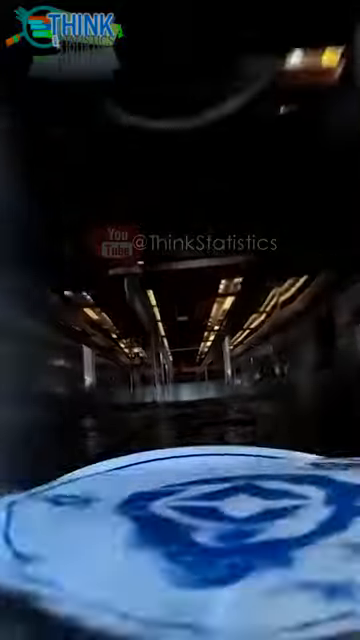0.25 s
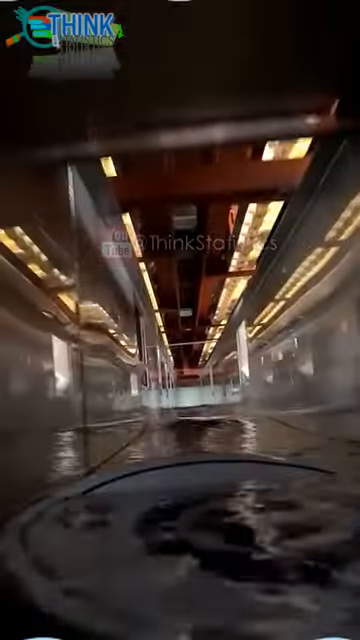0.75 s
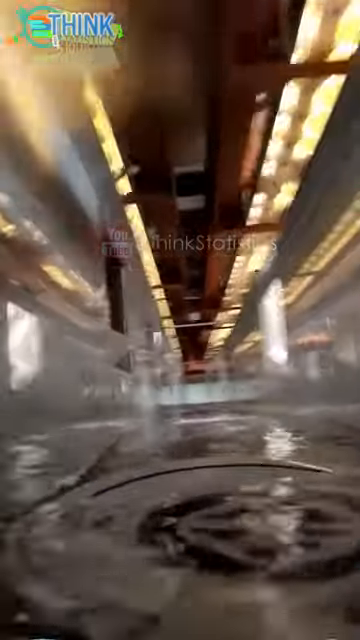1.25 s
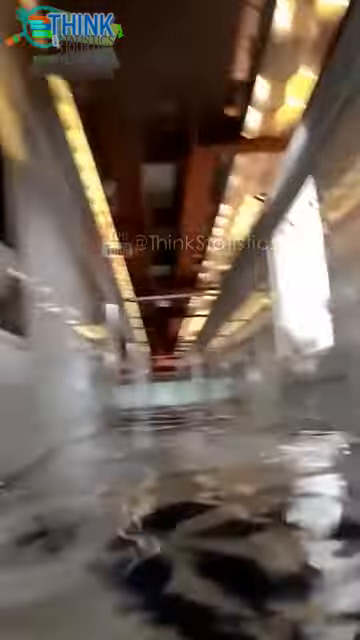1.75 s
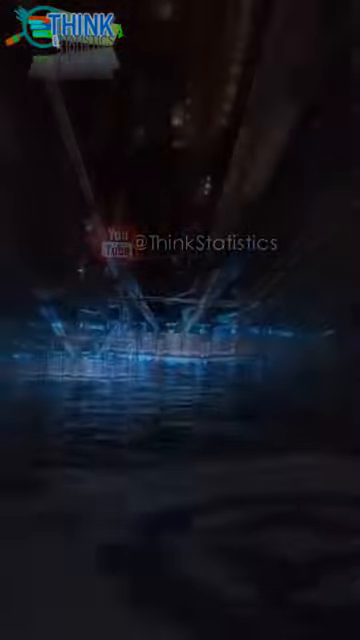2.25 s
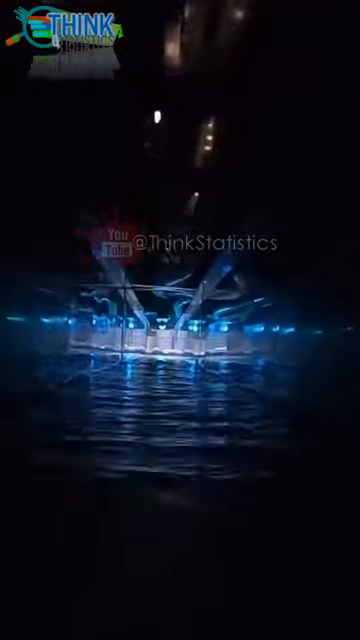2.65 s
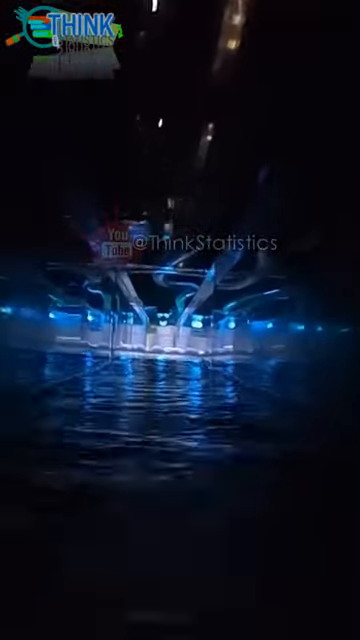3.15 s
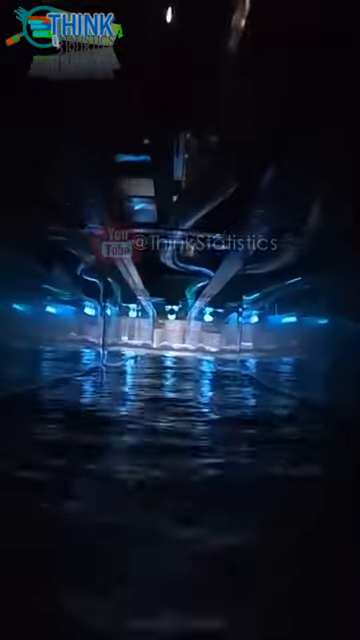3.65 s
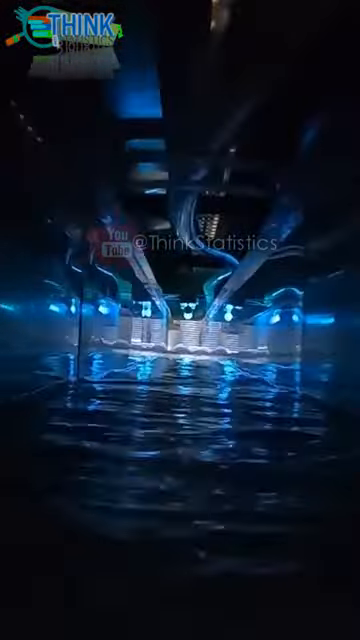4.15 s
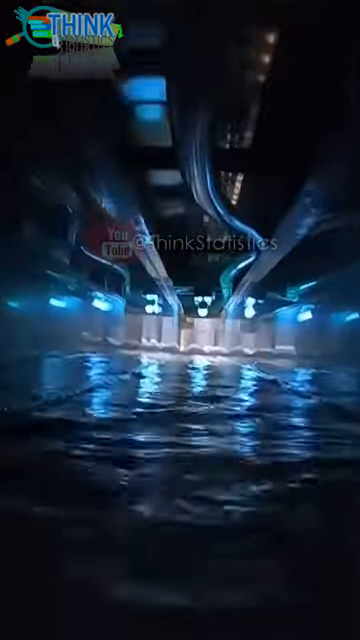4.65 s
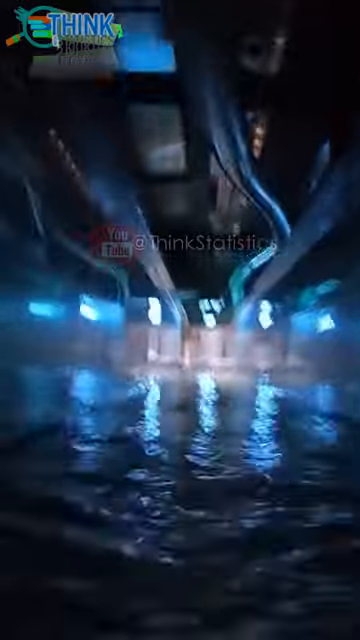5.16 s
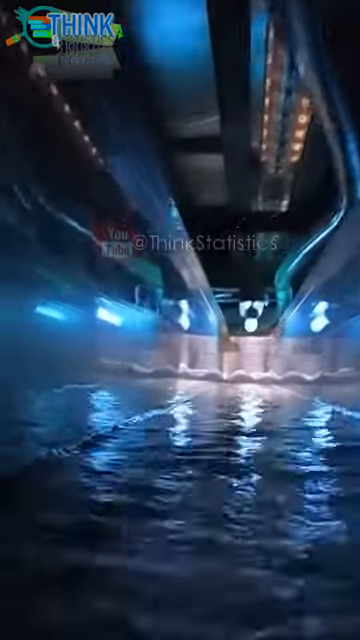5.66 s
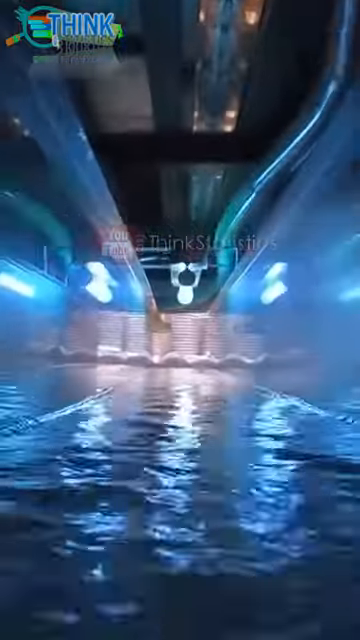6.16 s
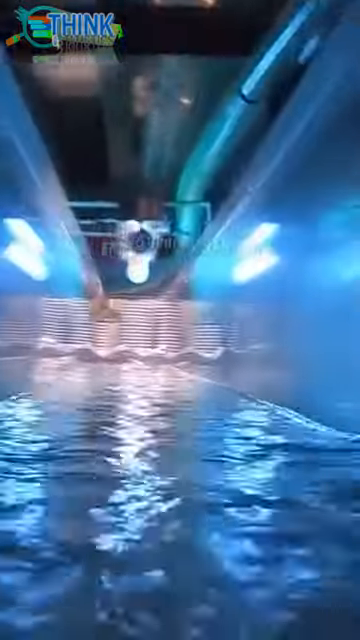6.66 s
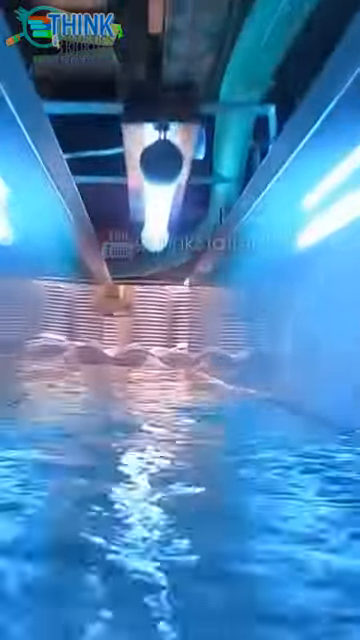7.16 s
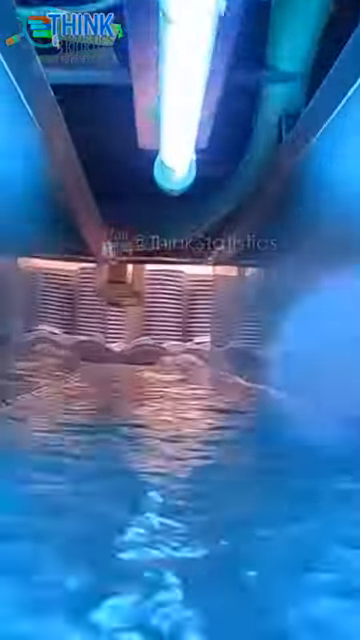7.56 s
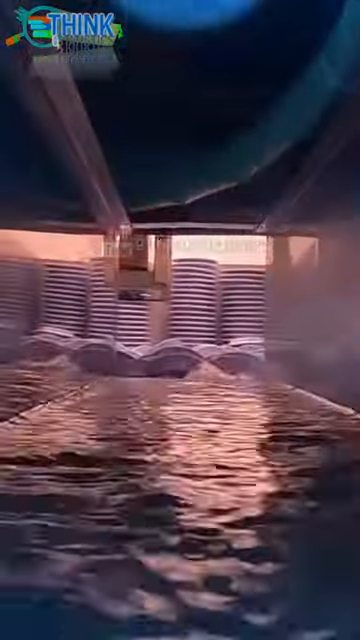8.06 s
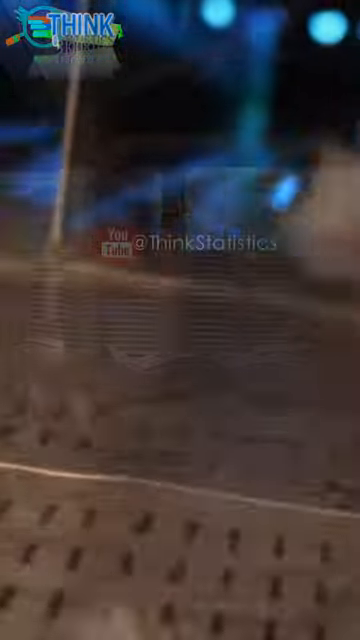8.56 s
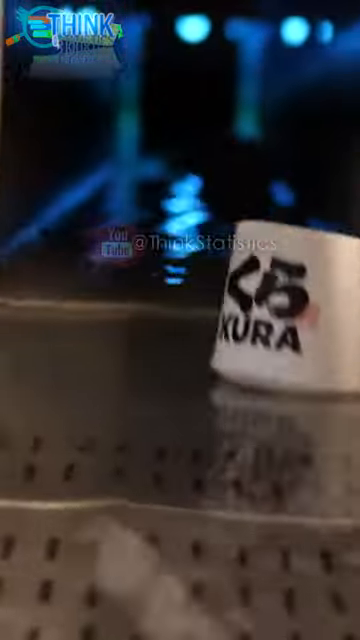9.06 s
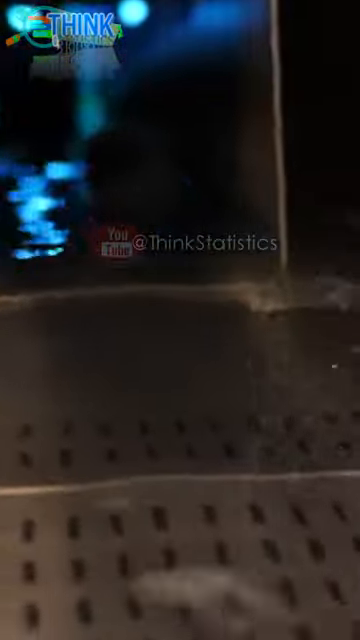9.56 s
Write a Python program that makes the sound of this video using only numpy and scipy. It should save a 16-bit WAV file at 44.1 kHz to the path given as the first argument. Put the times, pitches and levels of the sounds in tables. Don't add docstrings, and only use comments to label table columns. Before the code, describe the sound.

Steady booming machine hum with water moving around a waterproof microphone. At first it is mono and boxy, with swelling gurgles, hollow bubble plops, tiny wet chirps, low slaps and hard ticks. Near six seconds the perspective jumps to open stereo near the sprays, with wavering motor tones on the right, bright spatter on the left, and a dense burst of splashes and bubbles around eight seconds.

```python
import sys
import numpy as np
from scipy import signal
from scipy.fft import rfft, irfft, next_fast_len
from scipy.io import wavfile
from scipy.ndimage import uniform_filter1d, map_coordinates

SR = 44100
rng = np.random.default_rng(int(sys.argv[2]) if len(sys.argv) > 2 else 0)


def persist_wave(psi):
    counts = np.round(np.clip(psi, -1, 1) * 32767).astype(np.int16)
    wavfile.write(sys.argv[1], SR, np.atleast_2d(counts).T)


def volts_from_decibels(level):
    exponent = np.asarray(level, float) / 20
    return 10 ** exponent


N = 432180
JUMP_S = 6.07


def unit(x):
    return x / np.sqrt(np.mean(x ** 2) + 1e-20)


def along(points, hz):
    f, v = np.transpose(points)
    return np.interp(np.log(hz + 1), np.log(f + 1), v)


def curves(rows):
    s, *columns = np.transpose(rows)
    return [np.interp(np.arange(N) / SR, s, column) for column in columns]


def wobble(rate):
    at = np.arange(0, N + 32, 32)
    knots = rng.standard_normal(int(N * rate / SR) + 4)
    return np.interp(np.arange(N), at, map_coordinates(knots, [at * rate / SR]))


def filtered(x, response):
    m = next_fast_len(N + 8192)
    return irfft(rfft(x, m) * response(np.fft.rfftfreq(m, 1 / SR)), m)[..., :N]


def colour(spectrum, peaks, hz):
    bells = sum(db / (1 + (2 * (hz - centre) / width) ** 2) for centre, width, db in peaks)
    return volts_from_decibels(along(spectrum, hz) + bells)


def band(hz, lo_hz, hi_hz):
    return 1 / np.sqrt((1 + (lo_hz / (hz + 1)) ** 12) * (1 + (hz / hi_hz) ** 12))


def water(patchy_db, per_second, spread_db, channels):
    z = signal.stft(rng.standard_normal((channels, N)), nperseg=256)[2]
    across_pitch = uniform_filter1d(rng.standard_normal(z.shape[1:]), 3, 0)
    field = uniform_filter1d(across_pitch, 9, 1)
    hiss = unit(signal.istft(z * volts_from_decibels(patchy_db * unit(field)), nperseg=256)[1][:, :N])
    size = np.minimum(rng.exponential(size=N), 2.5)
    hit = (rng.random(N) < per_second / SR) * volts_from_decibels(spread_db * size)
    fall = [1, -np.exp(-1 / (0.0013 * SR))]
    bursts = signal.lfilter([1], fall, signal.lfilter([1], fall, hit))
    return hiss, unit(bursts) ** 2


def pings(s, db, hz, cycles, rise, attack):
    t = np.arange(SR // 25)[None] / SR
    life = (cycles / hz)[:, None]
    phase = 2 * np.pi * hz[:, None] * (t + rise * t * t / (2 * life))
    wave = volts_from_decibels(db)[:, None] * np.sin(phase) * volts_from_decibels(-26 * t / life) * (1 - np.exp(-t / attack))
    at = (np.round(s * SR).astype(int)[:, None] + np.arange(t.size)).ravel()
    return np.bincount(at, wave.ravel(), N + SR)[:N]


def cracks(s, db, t60, size=41):
    blows = np.bincount(np.round(s * SR).astype(int), volts_from_decibels(db), N)
    shape = signal.lfilter([1], [1, -volts_from_decibels(-60 / (t60 * SR))], blows)
    return np.abs(uniform_filter1d(shape, size=size)) * rng.standard_normal(N)


def after():
    return np.clip((np.arange(N) / SR - JUMP_S) / .004, 0, 1)


# start_s, level_db
PUMP_LEVEL = [(0.0, -13), (3.08, -12), (8.57, -12.5), (9.8, -14)]
# pitch_hz, level_db (per Hz)
PUMP_NOISE = [(15, -34), (25, -15), (55, -3), (141, -6), (172, -6), (222, -8.5), (309, -18), (403, -21.5),
              (424, -16.5), (520, -26.5), (680, -33), (1140, -120)]
# pitch_hz, width_hz, level_db
DUCT_RESONANCES = [(71.6, 4.1, 8), (99.6, 10.3, 4.5), (142, 26, 8)]
# pitch_hz, level_db (rms), waver_rad
MOTOR_TONES = [
    (100, -28, .4),
    (143, -29, 1.6),
    (430.6, -38, .35),
]
# pitch_hz, level_db (per Hz)
PORT_DIFFERENCE = [(15, -40), (25, -18), (64, -7), (108, 6), (140, 5.5), (212, -6), (260, -5), (340, -49),
                   (570, -120)]


def pump():
    level_db, = curves(PUMP_LEVEL)
    boom = unit(filtered(rng.standard_normal(N), lambda hz: colour(PUMP_NOISE, DUCT_RESONANCES, hz)))
    side = unit(filtered(rng.standard_normal(N), lambda hz: volts_from_decibels(along(PORT_DIFFERENCE, hz))))
    t = np.arange(N) / SR
    mid = volts_from_decibels(level_db - 5.0) * boom
    for hz, db, waver in MOTOR_TONES:
        mid += volts_from_decibels(db + 3 + 1.8 * wobble(4)) * np.sin(2 * np.pi * hz * t + waver * wobble(7))
    return mid + volts_from_decibels(-27) * after() * side * [[1], [-1]]


# pitch_hz, level_db (rms)
SECOND_MOTOR = [(371, -31), (760, -44), (272, -35), (437, -34)]


def hum():
    t = np.arange(N) / SR
    tones = np.zeros(N)
    for hz, db in SECOND_MOTOR:
        tones += volts_from_decibels(db + 3 * wobble(3)) * np.sin(2 * np.pi * hz * t + .8 * wobble(6))
    return tones * after() * volts_from_decibels([[-4], [4]])


def gurgle(count, centre_hz, cycles):
    when, pitch, size = rng.random((3, count))
    hz = centre_hz * 2 ** (1.2 * pitch - .6)
    return unit(pings(when * JUMP_S, -4 * np.log(1 - .9 * size), hz, cycles, .04, .004))


# start_s, churn_db, spray_db
FLOW = [(0, 4, -2.5), (.2, -6.5, -6.5), (.77, -9, -4.5), (.96, -11, -8), (.98, -5.5, 4.5), (1.38, 4.5, 3),
        (1.98, 2, 3), (2.18, 2.5, -3), (2.59, 8.5, 4.5), (2.83, 13.5, 3.5), (3.21, 9.5, 4), (3.54, 8.5, 3),
        (3.95, 0, 2), (4.85, 3.5, 3.5), (4.99, 6, 4.5), (5.39, 2.5, -0.5), (5.8, 2.5, 1.5), (6.07, -2, -4)]
# rest_db, db_per_churn_db, db_per_spray_db
WASH_LAYERS = [
    (-32, 0.3444, -0.33),
    (-37.5, 1.0, -0.24),
    (-45.5, -0.06, 0.42),
    (-53.5, 0.04, 1),
]
# pitch_hz, level_db (per Hz)
SEALED_WATER = [(180, -53), (300, -0.5), (427, 6), (486, 5.5), (599, 11), (881, -7), (1500, -11),
                (1760, -9), (2280, -27), (3190, -31.5), (3630, -30.5), (4120, -24), (4770, -39),
                (6070, -44), (14300, -68.5), (15600, -95)]
# pitch_hz, width_hz, level_db
HOUSING = [(570, 190, -3), (1190, 49, 1.5), (1750, 170, 3), (3100, 640, 10), (4160, 4600, -6.5),
           (6040, 320, 2.5)]


def wash():
    edges_hz = [(250, 1000), (1000, 2300), (2300, 5300), (5300, 12000)]
    grain = [0.24, 0.33, 0.056, 0.074]
    churn_db, spray_db = curves(FLOW)
    hiss, bursts = water(2.6, 70, 5.8, channels=1)
    bubbles = .13 * gurgle(count=900, centre_hz=1400, cycles=16)
    out = np.zeros(N)
    for (rest_db, by_churn, by_spray), (lo, hi), share in zip(WASH_LAYERS, edges_hz, grain):
        noise = hiss[0] * np.sqrt(1 + share * bursts) + bubbles
        layer = unit(filtered(noise, lambda hz: colour(SEALED_WATER, HOUSING, hz) * band(hz, lo, hi)))
        out += volts_from_decibels(rest_db + by_churn * churn_db + by_spray * spray_db) * layer
    return out * (1 - after())


# start_s (middle), level_db (low hiss), half_length_s,
# bright_db (bright hiss above the low)
WATER_SHEETS = [(0.042, -44, 0.019, -20), (0.174, -37, 0.011, -16), (0.487, -38, 0.063, -16),
                (1.024, -37, 0.039, 2.5), (4.85, -50.5, 0.27, -0.5), (4.975, -33, 0.014, -34),
                (5.677, -31.5, 0.05, -14), (6.672, -30.5, 0.011, 0.5), (1.18, -30.5, 0.028, -14),
                (1.337, -49, 0.021, 7), (1.407, -28.5, 0.015, -26), (2.115, -27, 0.016, -16),
                (2.137, -26.5, 0.011, -32), (2.25, -46, 0.026, 0), (2.454, -27.5, 0.017, -28),
                (2.937, -30, 0.038, -19), (3.695, -28.5, 0.035, -20), (4.523, -29, 0.015, -19),
                (4.867, -29.5, 0.035, -16), (5.15, -23.5, 0.028, -16), (5.402, -32, 0.079, -9.5),
                (5.929, -27, 0.02, -32), (6.014, -36, 0.038, -6), (8.172, -35, 0.048, -8),
                (8.438, -30.5, 0.052, -29), (8.502, -47, 0.0083, -2)]
# pitch_hz, width_hz, level_db
COVERED_HOUSING = [(1190, 200, 6), (1770, 220, 11), (2500, 300, 5), (3180, 220, 18), (4250, 380, 17),
                   (6150, 500, 15)]


def puffs():
    t = np.arange(0, N, 32) / SR
    slope = [(700, -3), (2000, -8), (3000, -16), (4500, -19), (7000, -28), (12000, -46)]  # Hz, dB
    out = np.zeros(N)
    for k, (lo, hi) in enumerate([(750, 2300), (2300, 12000)]):
        swell = np.zeros(len(t))
        for s, db, half, bright_db in WATER_SHEETS:
            swell += volts_from_decibels(db + k * bright_db) * np.exp(-((t - s) / half) ** 4)
        noise = rng.standard_normal(N)
        hiss = unit(filtered(noise, lambda hz: colour(slope, COVERED_HOUSING, hz) * band(hz, lo, hi)))
        out += np.interp(np.arange(N) / SR, t, swell) * hiss
    return out * volts_from_decibels(1.5 * wobble(60))


# start_s, level_db
JET_STRENGTH = [(6.07, 1), (6.3, 0.5), (6.98, 2.5), (7.63, 0), (8.1, 2.5), (8.27, 4.5), (8.6, 4), (9.44, 2),
                (9.8, 3.5)]
# rest_db, db_per_strength_db
JET_LAYERS = [
    (-25.5, 0.5),
    (-28.5, 0.86),
    (-48, 0.5),
    (-49, 2),
]
# pitch_hz, level_db (per Hz)
LEFT_PORT = [(200, -88), (280, -43), (400, -50.5), (620, -57.5), (900, -60.5), (1380, -64.5), (2400, -79),
             (3400, -75), (5400, -85), (6300, -76), (7300, -76), (10300, -72), (12000, -81.5), (16000, -85)]
# pitch_hz, level_db (per Hz)
RIGHT_PORT = [(200, -46), (280, -32), (440, -44.5), (490, -53.5), (760, -58.5), (1000, -68.5), (1500, -68),
              (2400, -79), (4000, -70), (5400, -84.5), (6000, -84), (7500, -93), (9500, -88), (13000, -86)]
# pitch_hz, width_hz, level_db
LEFT_RING = [(275, 16, 10.5), (524, 8.1, 10), (646, 4.9, 11.5), (1350, 27, 5), (1620, 60, 7),
             (2890, 150, 9.5), (3895, 140, 12), (4530, 1100, 11.5), (6250, 180, 3), (8200, 1000, 1.5)]
# pitch_hz, width_hz, level_db
RIGHT_RING = [(302, 39, -12), (362, 44, 6), (420, 3, 10), (587, 18, 5), (760, 25, 9.5), (869, 50, 10),
              (1350, 70, 5), (1620, 60, 7), (3900, 170, -6)]
# pitch_hz, likeness (0 to 1)
PORT_LIKENESS = [(250, 0), (380, 0.16), (550, 0), (900, 0.0053), (1400, 0.86), (3100, 0.63), (6800, 0),
                 (15000, 0.028)]


def spray():
    edges_hz = [(200, 470), (470, 2300), (2300, 5500), (5500, 17000)]
    grain = [.01, 0.034, 0.1, 0.2]
    strength_db, = curves(JET_STRENGTH)

    def split(hz):
        turn = np.arccos(np.clip(along(PORT_LIKENESS, hz), -1, 1)) / 2
        return np.array([np.cos(turn), np.sin(turn)])

    def ports(hz):
        return np.array([colour(LEFT_PORT, LEFT_RING, hz), colour(RIGHT_PORT, RIGHT_RING, hz)])

    hiss, bursts = water(2.1, 160, 3.5, channels=2)
    mid, side = filtered(hiss, split)
    out = np.zeros((2, N))
    for (rest_db, grows), (lo, hi), share in zip(JET_LAYERS, edges_hz, grain):
        pair = np.array([mid + side, mid - side]) * np.sqrt(1 + share * bursts * [[1], [.25]])
        layer = unit(filtered(pair, lambda hz: ports(hz) * band(hz, lo, hi)))
        flutter_db = 1.2 * (lo > 2000) * wobble(7)
        out += volts_from_decibels(rest_db + grows * strength_db + flutter_db) * layer
    return out * after()


# start_s, level_db (rms)
GLANCING_JETS = [(6.246, -29.5), (6.27, -36), (8.375, -33), (9.585, -34)]


def sizzle():
    s, db = np.transpose(GLANCING_JETS)
    rush = filtered(cracks(s, db + 7, 0.14, size=41), lambda f: band(f, 3700, 5000))
    return volts_from_decibels([[3], [-4]]) * rush


# start_s, level_db (peak), pitch_hz, life_cycles
SINGING_BUBBLES = [(0.17, -13, 1400, 15), (0.94, -36, 2400, 74), (0.945, -26, 1890, 52),
                   (0.98, -31, 3150, 63), (1.0394, -27, 3280, 90), (2.105, -16, 3100, 28),
                   (2.116, -18, 3080, 28), (2.129, -12, 880, 22), (2.13, -17, 1800, 30),
                   (2.207, -29, 3260, 40), (2.209, -17, 1780, 35), (2.43, -18, 1850, 38),
                   (2.4773, -21, 3000, 60), (2.5835, -26, 4130, 51), (2.659, -26, 4100, 60),
                   (2.7237, -28, 4160, 70), (3.2, -13, 1280, 20), (3.71, -16, 940, 41),
                   (4.3, -22, 1400, 58), (4.362, -13, 1600, 20), (5.575, -26, 1380, 30),
                   (5.623, -23, 1396, 100), (5.6381, -22, 3500, 30), (5.755, -22, 1750, 50),
                   (5.815, -15, 1250, 19), (5.881, -14, 2150, 25), (6.0214, -29, 3110, 60),
                   (7.6, -22, 1670, 18), (8.395, -21, 1400, 28), (8.408, -19, 1900, 18),
                   (8.455, -16, 1400, 23), (9.015, -20, 1450, 25), (9.63, -20, 1250, 30)]


def chirps():
    s, db, hz, cycles = np.transpose(SINGING_BUBBLES)
    return pings(s, db - 0.5, hz, cycles, 0.022, 0.0029)


# start_s, level_db (peak), pitch_hz
FLOOR_SLAPS = [(1.689, -13.5, 98), (2.154, -8.5, 100), (5.927, -7, 91)]


def thumps():
    s, db, hz = np.transpose(FLOOR_SLAPS)
    return pings(s, db + 3.5, hz, 4.6, 0, 0.0018)


# start_s, level_db (peak), pitch_hz,
# life_cycles
BUBBLES = [(0.368, -13, 680, 7), (0.441, -6, 1190, 7.4), (0.613, -15, 660, 7.3), (0.795, -17, 423, 18),
           (0.867, -22.5, 1126, 24), (1.086, -17, 1400, 11), (1.392, -20, 1740, 21), (1.454, -19, 575, 15),
           (1.681, -8.5, 785, 6.8), (2.145, -9, 850, 16), (2.207, -23, 815, 16), (2.8, -16, 1230, 16),
           (2.878, -13, 1186, 17), (3.262, -18, 1163, 29), (3.37, -19, 1100, 34), (3.479, -12, 1190, 10),
           (3.625, -8, 980, 9.2), (4.085, -7.5, 1900, 10.3), (4.594, -14.5, 603, 11),
           (4.847, -16.5, 1800, 23), (5.115, -18.5, 595, 30), (5.875, -4.5, 2000, 19),
           (5.913, -16.5, 1190, 34), (8.186, -12, 1860, 15), (8.413, -14, 1390, 11),
           (8.434, -13, 1490, 7.2), (8.447, -7, 1850, 11), (8.482, -2.5, 1750, 3.7),
           (9.584, -6.5, 1420, 9.1), (9.729, -1.5, 1450, 3.9), (0.994, -21, 666, 9.8),
           (1.169, -19, 1380, 15), (1.192, -19, 626, 10), (1.262, -19, 1200, 16), (1.922, -19, 664, 7.8),
           (2.65, -15, 590, 4.8), (3.006, -19, 1180, 11), (3.194, -22, 1090, 13), (3.971, -19.5, 1750, 30),
           (4.026, -17.5, 1620, 15), (4.62, -22, 1050, 11), (4.912, -13, 1750, 21),
           (5.004, -17.5, 1760, 32), (5.33, -28, 662, 7.5), (8.145, -16, 1350, 10), (8.163, -14, 1750, 9.8),
           (8.261, -12, 880, 6), (8.274, -21, 890, 6), (8.49, -14, 1400, 6.9), (2.145, -15, 1350, 14),
           (5.876, -10, 2400, 13),
           (2.141, -9, 950, 14), (5.877, -11, 1550, 10), (5.93, -13, 900, 3)]


def plops():
    s, db, hz, cycles = np.transpose(BUBBLES)
    rush = filtered(cracks(s, db - 6, .03, size=401), lambda f: band(f, 700, 2600))
    pinch = pings(s + 0.00092, db - 5, hz * 1.3, 5.8, -0.17, 0.0012)
    pinch += pings(s + 0.0011, db - 3.0, hz * 0.75, 3.2, 0.06, 0.00069)
    tone = pings(s, db + 6.0, hz * 0.987, np.clip(cycles, 2, 30), .1, 0.0035)
    return tone + pinch + rush


# start_s, level_db (peak), pitch_hz, crack_db
HOUSING_DROPS = [(0.029, -24, 2900, -29), (0.1002, -29, 3730, -19), (1.1443, -25.5, 3280, -1),
                 (1.216, -24.5, 3000, -24), (1.279, -26.5, 2400, -30), (1.3184, -26, 4160, -11),
                 (2.6494, -29, 4100, -25), (2.89, -26, 3070, -4), (2.9312, -12.5, 3740, -41),
                 (2.998, -18, 2670, -22), (3.085, -11, 3900, -43), (3.49, -16.5, 4700, -39),
                 (4.0835, -19.5, 3800, -12), (4.3667, -22, 3120, -27), (5.3905, -15.5, 3860, -18),
                 (5.447, -15, 3700, -15), (5.603, -24, 3040, -12), (5.6865, -20, 2700, -31),
                 (5.7628, -7.5, 6300, -10.5), (5.877, -27, 2500, -30), (6.497, -22, 2620, -12),
                 (6.6664, -11, 4000, -5), (7.944, -32, 4130, 6), (8.14, -7.5, 6000, -5),
                 (8.139, -23, 4000, -22), (5.438, -44, 5440, 8), (8.1733, -19, 3970, -15),
                 (8.188, -15, 3900, -20), (8.433, -19, 3730, -30), (8.4457, -19, 3300, -24),
                 (8.482, -16, 2490, -32), (8.492, -18, 3860, -34), (0.175, -24, 2820, -28),
                 (0.6823, -31, 2440, -30), (0.844, -36, 3030, -28), (1.925, -28, 3350, -25),
                 (3.4386, -26, 4210, -27), (3.6676, -34, 3170, -27), (4.5935, -28, 2720, -25),
                 (5.132, -25, 3200, -5), (5.3143, -27, 3190, -25), (5.7314, -30, 3350, -26),
                 (7.7566, -27, 2800, -20), (8.162, -21, 4000, -25), (8.249, -23, 4100, -25),
                 (8.262, -21, 3850, -25), (8.397, -27, 3560, -25), (8.4632, -29, 3000, -30),
                 (9.59, -18, 3900, -30),
                 (0.046, -27, 2900, -30), (5.7625, -16, 4000, -30), (5.8755, -21, 5000, -30),
              (8.549, -28, 3100, -20), (8.588, -26, 2200, -30), (8.59, -26, 4000, -30),
              (8.709, -25, 3150, -30), (9.495, -27, 3100, -20)]


def ticks():
    s, db, hz, crack_db = np.transpose(HOUSING_DROPS)
    snap_s = s + .0015
    crack = filtered(cracks(snap_s, db + crack_db + 15.0, 0.011, size=61), lambda f: band(f, 5900, 5760))
    thud_db = db - 14 * np.log2(np.maximum(hz / 4000, 1))
    thud = filtered(cracks(snap_s, thud_db, .014, size=41), lambda f: band(f, 1800, 4700))
    return pings(s, db + 4, hz * .97, 12, .12, .0007) + crack + thud


# start_s, level_db (peak), pitch_hz
FINE_DROPS = [(6.2577, -10.5, 10800), (6.353, -7, 9240), (6.389, -5.5, 9630), (6.517, -11, 9100),
              (6.765, -6, 9300), (6.794, -10, 12000), (6.859, -8, 10200), (6.965, -13, 11300),
              (6.9724, -8.5, 14400), (7.042, -4, 9900), (7.0664, -10.5, 12300), (7.404, -5.5, 11800),
              (8.007, -12.5, 9800), (8.105, -6.5, 10700), (8.152, -8.5, 10400), (8.1908, -4.5, 9450),
              (8.262, -6.5, 9660), (8.287, -22, 10200), (8.312, -4, 9150), (8.335, -4.5, 10700),
              (8.3638, -7, 11000), (8.409, -1.5, 9300), (8.414, -13, 10500), (8.4254, -21, 9670),
              (9.086, -4.5, 11300), (9.218, -3.5, 9500), (9.309, -5.5, 8800), (9.334, -6, 10300),
              (9.577, -4, 8700), (9.5984, -27, 10000)]
# start_s, level_db (peak), pitch_hz
FAT_DROPS = [(6.704, -12, 6150), (6.7105, -18, 7300), (6.89, -5.5, 5930), (6.9064, -35, 6260),
             (7.109, -12.5, 5900), (7.1143, -9.5, 5900), (7.253, -6, 7100), (7.2657, -3.5, 7500),
             (7.413, -9.5, 5650), (7.7693, -1, 6150), (8.1274, -11, 6150), (8.275, -8.5, 6400),
             (8.304, -6, 6200), (8.6647, -13, 6800), (8.919, -4, 6240), (8.955, -8.5, 6600)]
# start_s, level_db (peak), pitch_hz
SMALL_DROPS = [(6.1023, -36, 9540), (6.2514, -26, 6320), (6.5353, -28, 8460), (6.5822, -27, 11200),
               (6.7398, -33, 9200), (7.2355, -17, 6700), (7.32, -20, 8830), (7.5839, -26, 9200),
               (7.753, -18, 11900), (8.7363, -17.5, 6260), (8.8765, -18, 10100), (8.944, -11, 10700),
               (9.0127, -18, 9400), (9.0474, -12.5, 4980), (9.178, -12.5, 11300), (9.3783, -20, 9600),
               (9.402, -16, 9250), (9.4616, -19, 10400), (9.4991, -20, 6350), (9.707, -13, 6100),
               (6.635, -27, 12500), (7.186, -26, 13000), (8.374, -4, 10000), (8.182, -23.5, 12000),
               (8.592, -22, 12500), (8.785, -26, 9500)]


def drops():
    s, db, hz = np.transpose([*FINE_DROPS, *FAT_DROPS, *SMALL_DROPS])
    top_db = -21.5 + 0.71 * db + 11 * np.log2(hz / 9000)
    late, weak = rng.random((len(s), 2)), rng.random((len(s), 2))
    at = np.c_[s, s[:, None] + .016 * late].ravel()
    spatter_db = np.c_[0 * s, -13 - 12 * weak]
    blows = cracks(at, (db[:, None] + spatter_db).ravel() - 9.5, 0.012, size=51)
    body = filtered(blows, lambda f: colour([(1000, 0)], LEFT_RING, f) * band(f, 6440, 10300))
    ring = pings(s, db - 1, hz, 18, .05, .001)
    ring += pings(s, db - 17, 3870 + 0 * s, 30, 0, .001)
    crack_db = (top_db[:, None] + spatter_db).ravel() + 10.5
    pair = np.array([cracks(at, crack_db, 0.008, size=51) for port in range(2)])
    top = filtered(pair, lambda f: band(f, 8900, 15000))
    return volts_from_decibels([[0], [-22]]) * (body + ring) + volts_from_decibels([[0], [-3]]) * top


def scene():
    background = pump() + hum()
    flow = wash() + puffs() + spray() + sizzle()
    return background + flow + chirps() + thumps() + plops() + ticks() + drops()


def band_limit(x):
    return signal.sosfilt(signal.butter(12, 16510, fs=SR, output="sos"), x)


def record(dry):
    x = filtered(dry, lambda hz: np.where(hz < 15750, 1, volts_from_decibels(-34)))
    x = x / (1 + np.abs(x / .95) ** 4) ** (1 / 4)
    return band_limit(x)


dry = scene()
out = record(dry)
persist_wave(out)
```